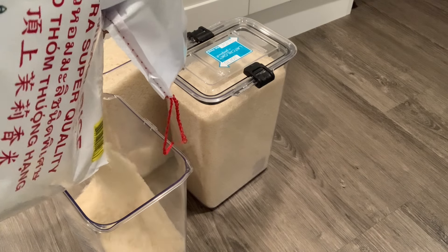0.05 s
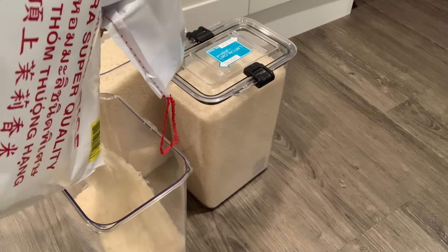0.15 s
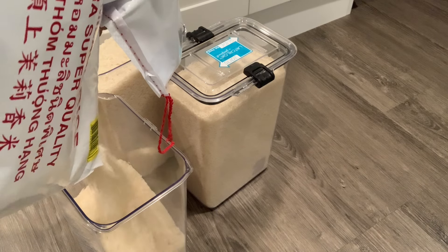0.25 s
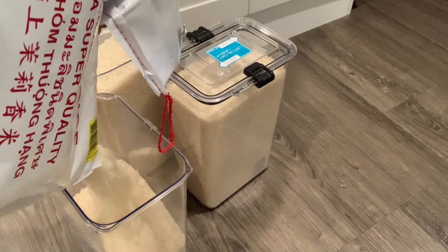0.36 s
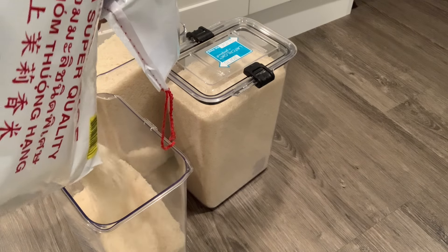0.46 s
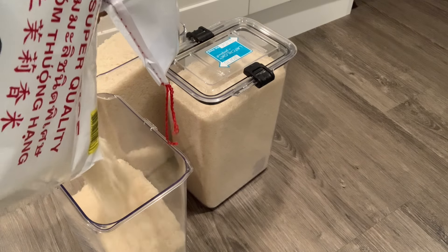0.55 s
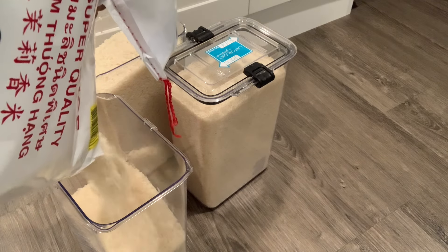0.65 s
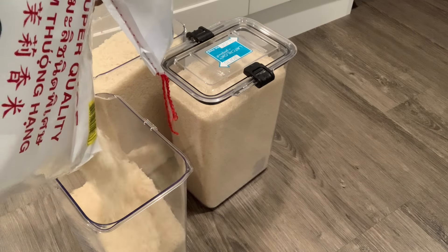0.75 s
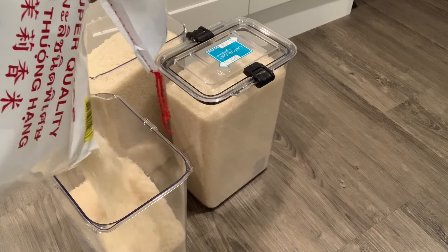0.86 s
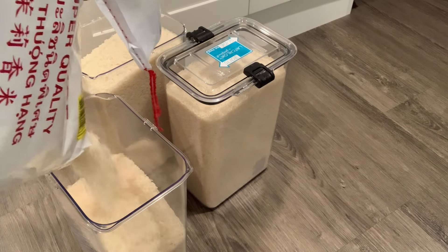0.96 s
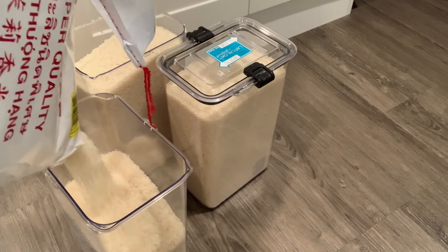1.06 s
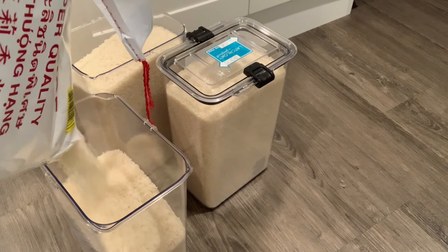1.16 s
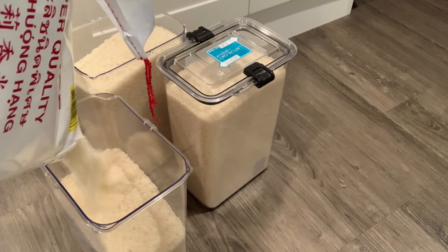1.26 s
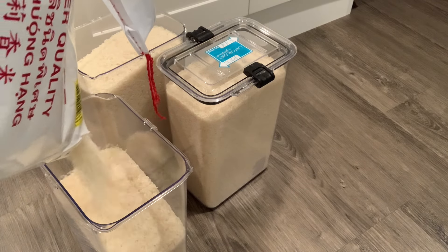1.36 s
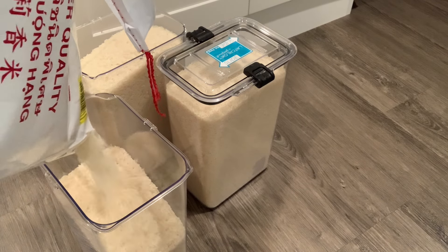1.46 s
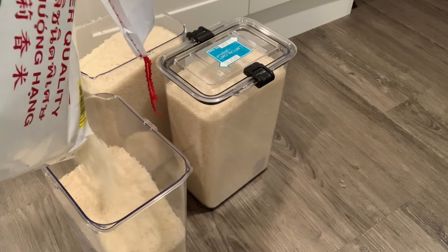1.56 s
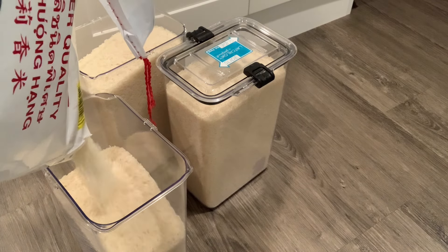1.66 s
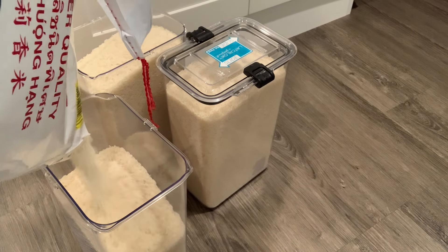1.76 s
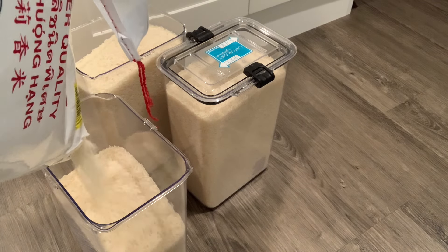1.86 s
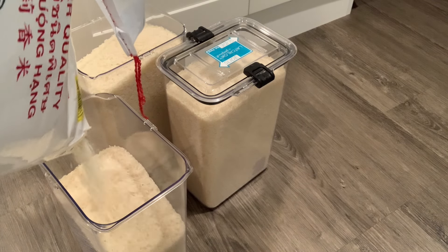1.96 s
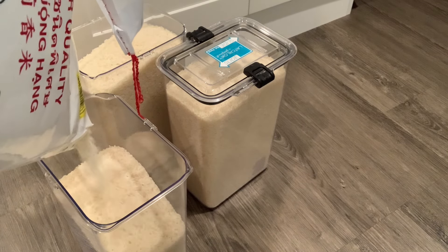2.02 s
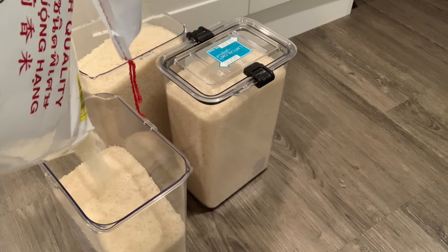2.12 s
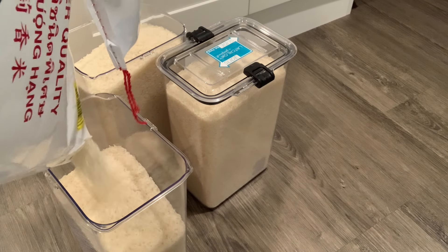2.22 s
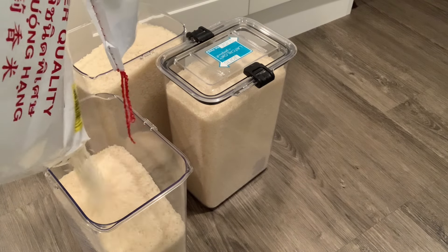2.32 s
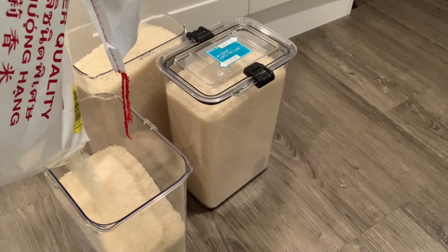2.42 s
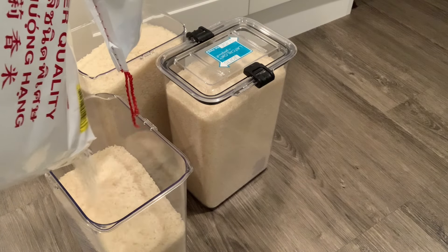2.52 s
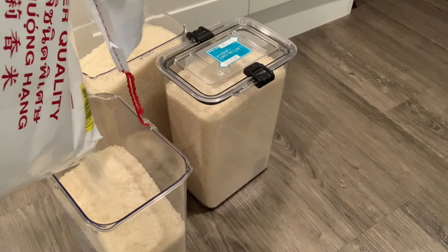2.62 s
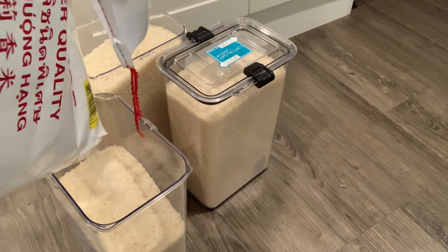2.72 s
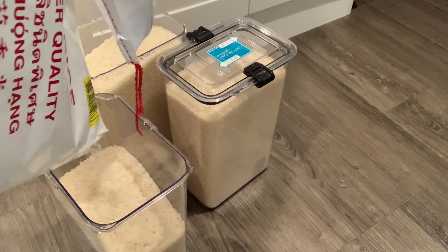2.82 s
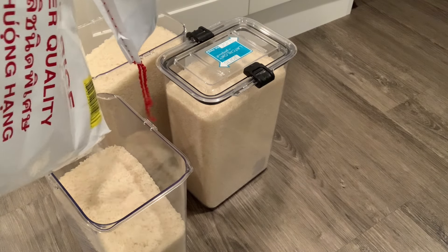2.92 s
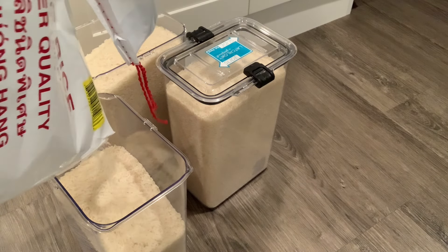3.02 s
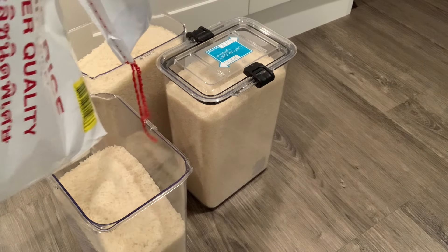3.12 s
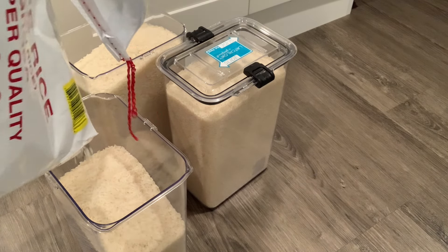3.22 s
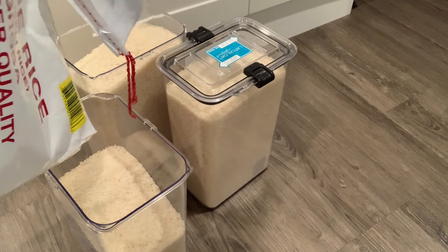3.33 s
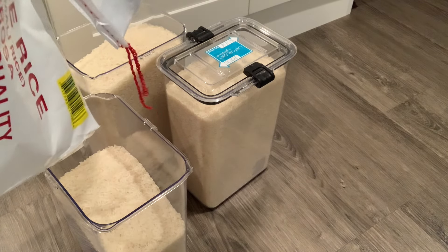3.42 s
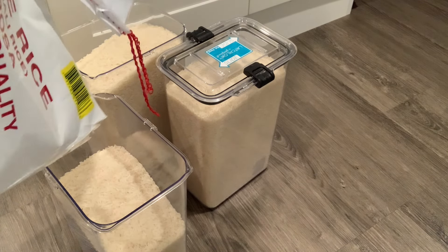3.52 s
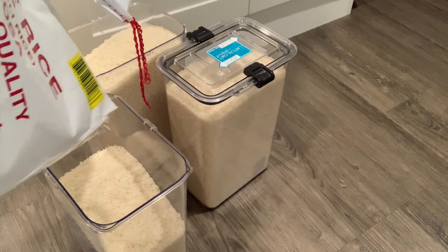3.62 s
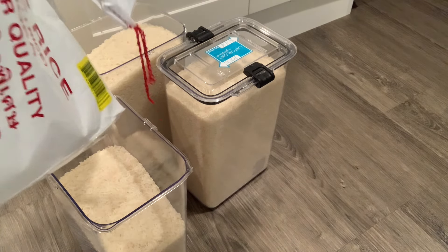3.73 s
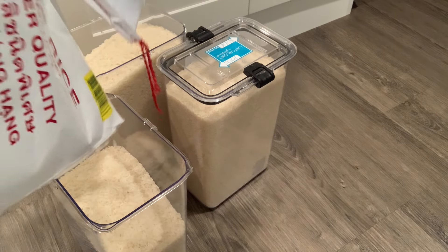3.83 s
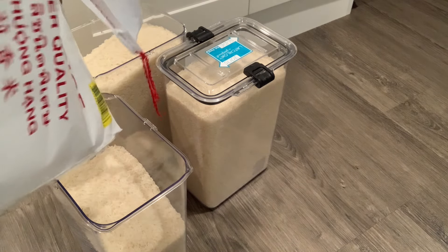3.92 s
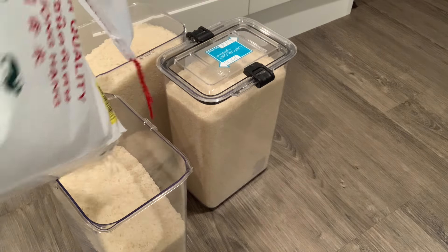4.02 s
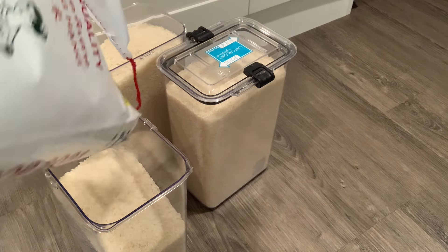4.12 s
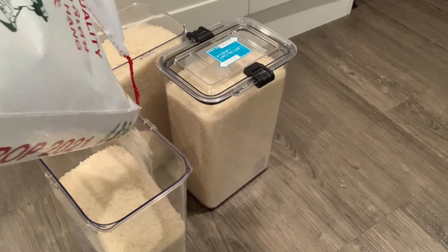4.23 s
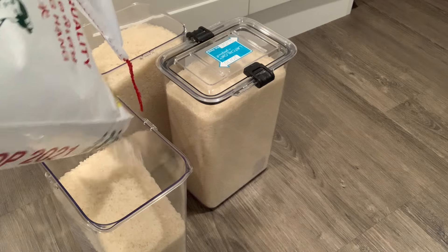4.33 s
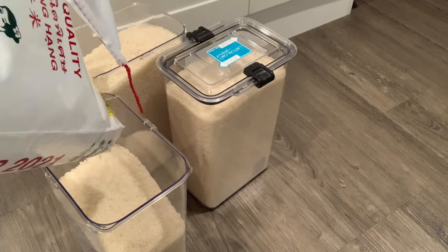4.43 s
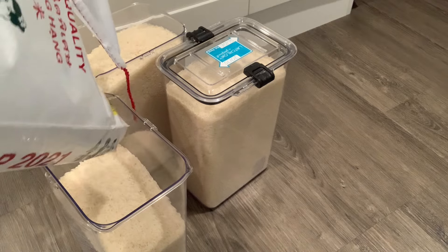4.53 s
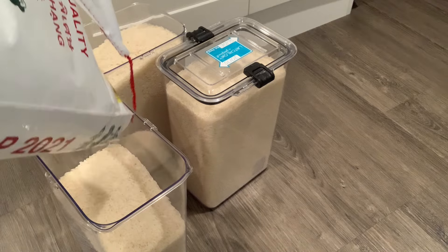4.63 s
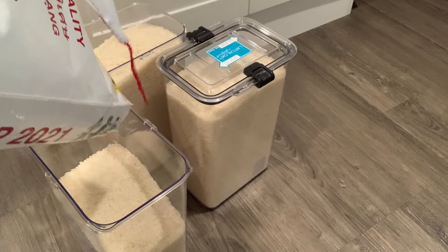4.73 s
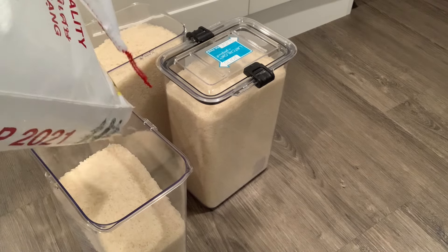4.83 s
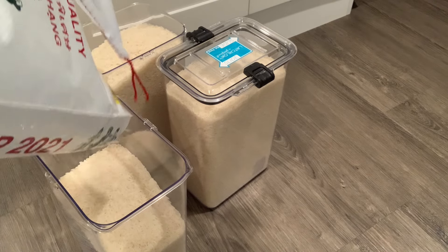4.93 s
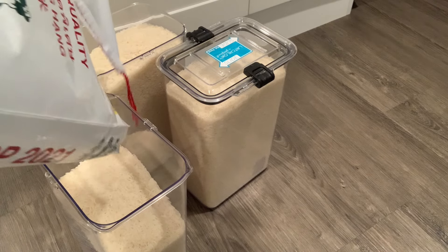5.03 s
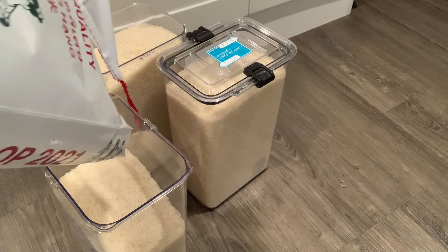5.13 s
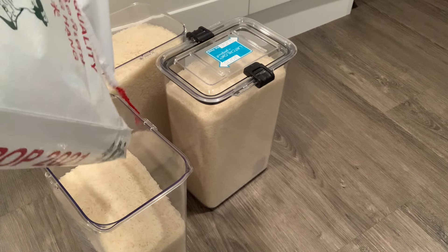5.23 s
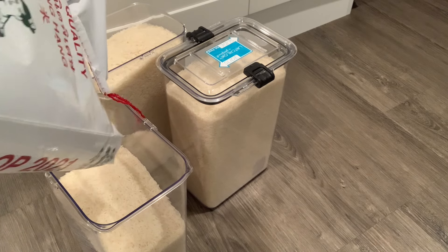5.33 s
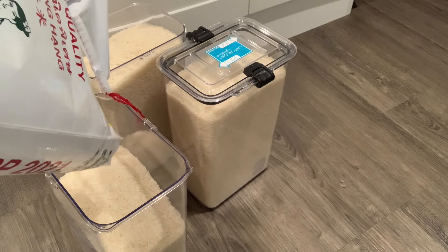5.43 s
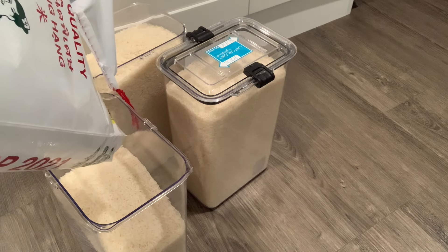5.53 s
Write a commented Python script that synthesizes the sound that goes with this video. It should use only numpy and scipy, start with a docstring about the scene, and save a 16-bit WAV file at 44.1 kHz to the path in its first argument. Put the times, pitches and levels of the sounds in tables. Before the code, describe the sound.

Close stereo pickup in a quiet home kitchen: rice streams steadily onto a heap in a tub, sliding along stiff plastic film. One sharp crack comes early, and a burst of heavy buckling thumps follows two seconds in. The rush fades to a few ticks near the middle. The sack is tipped again, giving a short gush, uneven patter, crinkling creases and a final cluster of booming pops.

```python
"""Dry rice hisses from a big plastic sack into a plastic tub on a kitchen floor.
Grains hit the heap as random impacts; others slide and patter along the sack's wall and make it drum.
The stiff sack buckles with pops and dull thumps, and its creases crinkle with sharp ticks.
The flow thins out, then the sack is tipped again. Filtered impacts make the noisy sounds;
short sine waves make the ringing ones. Faint room noise and kitchen echoes surround them."""
import sys
import numpy as np
from scipy import signal
from scipy.fft import rfft, irfft, next_fast_len
from scipy.io import wavfile
from scipy.ndimage import uniform_filter1d

SR = 44100
rng = np.random.default_rng(int(sys.argv[2]) if len(sys.argv) > 2 else 0)


def to_wav(s):
    """Save 16-bit WAV."""
    ch = np.atleast_2d(s).T  # columns
    pcm = np.round(np.clip(ch, -1, 1) * 32767)  # PCM
    wavfile.write(sys.argv[1], SR, pcm.astype(np.int16))


N = 245637
TIME = np.arange(N) / SR
PADDED = next_fast_len(N + SR // 2) // 2 * 2
HZ = np.maximum(np.arange(PADDED // 2 + 1) * SR / PADDED, 1)
PATHS = (3, N)  # sound that reaches both microphone ports alike, the left only, the right only

# Levels in these tables and settings are starting points: the functions add fixed trims to many of them.

# rice stream landing on the heap: start_s, level_db
STREAM_LEVEL = [(0.0, -26.5), (1.5, -29.5), (1.97, -35), (2.34, -31.5), (3.23, -53), (3.36, -56.5),
                (3.43, -76), (3.74, -71), (3.82, -52.5), (3.92, -52.5), (4.0, -52.5), (4.34, -44),
                (4.5, -47), (5.57, -51.5)]
# pockets of rice that land all at once when the sack is tipped again: top_s, level_db, fall_by_10_db_s
RICE_GUSHES = [(4.3, -32, 0.105)]
# rice sliding along the sack towards its mouth: start_s, level_db
SLIDE_LEVEL = [(0.0, -30.5), (0.49, -31), (1.61, -38), (1.95, -37.5), (2.44, -28.5), (2.87, -35),
               (3.4, -51), (3.72, -63), (3.915, -64), (3.955, -48.5), (4.17, -41.5), (4.34, -36),
               (4.52, -36.5), (4.66, -32.5), (4.86, -37.5), (5.02, -41), (5.2, -42.5), (5.36, -33),
               (5.57, -32.5)]
# the load slips inside the sack and the slide swells: top_s, level_db, fall_by_10_db_s
LOAD_SLIPS = [(2.45, -32, 0.03), (2.52, -34.5, 0.09), (2.83, -35, 0.0154), (2.892, -35, 0.0035),
              (3.1, -39.5, 0.0039), (3.147, -41, .015), (3.187, -42, 0.01), (3.3, -48, 0.06),
              (4.04, -45.5, 0.03), (4.41, -37.5, 0.0242), (4.69, -33.5, 0.05), (4.808, -32, 0.0359),
              (5.48, -30, 0.07)]
# an even flow breaks into clumps as the sack runs low: start_s, clumping_db
FLOW_CLUMPING = [(2.2, 1.23), (4.2, 2.9)]
# the sack gapes after the big buckle, lies flat when tipped again, bulges as it is folded:
# start_s, hollow_level_db
SACK_HOLLOWNESS = [(0, -3.5), (1.8, -2), (2.4, 1), (3.3, 4), (3.7, 3.5), (4.1, -4.5), (4.8, -4.5),
                   (5.03, -1.5), (5.2, 1.5), (5.42, -2.5)]

# tone colour of grains on the heap: pitch_hz, relative_level_db_per_hz
HEAP_COLOUR = [(100, -11), (550, -3.5), (1500, -26.5), (4000, -4.5), (7000, -4), (10000, -3), (14000, 2),
               (16000, -1)]
# resonances of the air above the heap: pitch_hz, width_hz, boost_db
TUB_AIR_RESONANCES = [(1600, 360, 9), (670, 170, 3.5)]
# tone colour of grains sliding on the film: pitch_hz, relative_level_db_per_hz
FILM_COLOUR = [(200, -39), (900, -3.5), (1600, 1), (2400, 3), (4000, -0.55), (6000, -3.5), (8500, -13),
               (16000, -22.5)]
# tub resonances woken by the sliding rice: pitch_hz, width_hz, boost_db
TUB_RESONANCES = [(1595, 120, 4.5), (3800, 160, 2.5)]
# tone colour of the hollow drumming: pitch_hz, relative_level_db_per_hz
DRUM_COLOUR = [(60, -33), (190, -6), (350, -4), (620, 3), (820, 2.5), (1050, 1), (1500, 2.5), (2200, -0.5),
               (5000, -26.5)]
# resonances of the sack's cavity: pitch_hz, width_hz, boost_db
CAVITY_RESONANCES = [(225, 27, 6), (369, 41, 6), (485, 27, 3.5), (657, 54, 5), (831, 42, 6), (990, 44, 3.5),
                     (1214, 50, 3), (1433, 47, 2)]
# drumming: reference slide level, drum level at that slide, and share of the slide's swing in dB
FULL_SLIDE_DB, DRUM_DB, DRUM_FOLLOWS = -30, -31.5, 0.71
# the sack's mouth flexes, so resonances wander: rough share of their pitch, changes a second
FLEX_SHARE, FLEX_PER_S = .045, 5
# range of centre pitches for clumps tapping the film
PATTER_LOW_HZ, PATTER_HIGH_HZ = 1100, 4900

# tone colour of the swaying wall: pitch_hz, relative_level_db_per_hz
SWAY_COLOUR = [(20, -35), (45, -3.5), (85, 1), (130, -6.5), (250, -14), (800, -39.5)]
# the wall's slowest swing: pitch_hz, width_hz, boost_db
WALL_RESONANCES = [(89, 71, 2.5)]
# the load shifts and the wall heaves: top_s, level_db, fall_by_10_db_s
WALL_HEAVES = [(1.562, -31.5, 0.04), (1.87, -25.5, 0.04), (1.99, -30, 0.0152), (2.05, -29, 0.07),
               (2.24, -23, .015), (2.287, -16, 0.0056), (2.39, -38, 0.1), (2.655, -41.5, 0.1),
               (3.485, -44, 0.1), (5.14, -26, 0.0169), (5.29, -20, 0.04)]
# trembling wall: level under a 0 dB stream, and share of the stream's swing in dB
TREMBLE_DB, TREMBLE_FOLLOWS = -25.5, 0.86

# crease snaps at set times, loud and faint: start_s, peak_db, body_relative_to_peak_db, body_pitch_hz
CREASE_SNAPS = [(0.0933, -18, 0, 1920), (0.2837, -4, -1, 2790), (1.1942, -27.5, 10.5, 2700),
                (1.522, -22.5, 12, 2810), (2.2704, -7, -1.5, 2985), (2.585, -16, 0.5, 2400),
                (2.788, -16, -15, 2970), (2.825, -20, 0.5, 1790), (3.2117, -20.5, -14, 2990),
                (3.802, -19.5, -21, 4040), (3.8762, -34.5, -12, 4000), (3.924, -29, -7, 4000),
                (4.1724, -14.5, -1, 3100), (4.178, -22, 4, 3070), (4.2816, -14, -4.5, 2300),
                (4.3914, -27, 7, 3000), (4.4044, -27, 8, 1690), (4.4658, -17.5, 4, 2100),
                (4.5405, -18, 9, 1800), (4.585, -27.5, 12.5, 1900), (4.621, -20.5, 4, 2800),
                (4.7048, -16, -6, 3220), (4.8355, -23, -12, 3000), (4.9558, -21.5, 5, 1560),
                (5.0013, -15.5, -1, 3600), (5.3625, -18, 3.5, 2500), (5.43, -10.5, 0.5, 3320),
                (5.455, -15, -2, 3000), (5.471, -19, 2, 3180), (5.491, -19, 6, 2600)]
# small creases snap while the sack is bent:
# start_s, end_s, snaps_per_s, typical_peak_db, body_relative_to_peak_db
SACK_BENDS = [(4.68, 5.15, 26, -23.5, -5), (5.297, 5.55, 13, -22, -6)]
# tone colour of a crease tick: pitch_hz, relative_level_db_per_hz
TICK_COLOUR = [(500, -50), (2000, -13), (5000, -3), (9000, 4.5), (13500, 2), (16000, 2)]
SMALL_SPREAD_DB, SMALL_HZ = 3.5, 2800  # small snaps: most above or below typical, body pitch
CREASE_OCTAVES, CREASE_T60_S = 1.8, 0.026  # pitch spread and time to die away by 60 dB

# the sack buckles: start_s, knock_peak_db, crack_db, thump_db, pop_db, pop_pitch_hz
# (crack, thump and pop levels are relative to the knock)
SACK_BUCKLES = [(0.163, -21.5, -16, -5, 0.5, 740), (0.283, -8, -6.5, -20, 1, 1502),
                (1.115, -25.5, -18, -1, -8, 706), (1.523, -14.5, -12, -2, 0, 720),
                (1.549, -18.5, -16, -2, -2, 560), (1.852, -13, -8.5, -5, -2.5, 1148),
                (2.011, -17.5, -25, -4, 4.5, 760), (2.05, -17, -22, -3, 2.5, 780),
                (2.077, -17.5, -24, -1, 4.5, 780), (2.119, -18.5, -3, -18, -6, 1410),
                (2.227, -5, -12.5, 0, -2, 820), (2.273, -8, -5.5, -6, -1, 652),
                (2.287, -2, -8.5, -3, -2, 753), (2.49, -17.5, -5, -3, -1, 800),
                (2.652, -14.5, -18, 0, 1, 800), (4.121, -24, -12, 5, 1, 1450),
                (5.078, -13.5, -10, -2, 0, 760), (5.113, -25.5, -18, 8.5, 1, 450),
                (5.131, -19, -16, -3, 0.5, 700), (5.153, -18, -15, 0, 3.5, 760),
                (5.199, -18, -9, -2, 0, 1000), (5.22, -15.5, -13, -3, 3.5, 720),
                (5.242, -10, -10, -11, 0.5, 850), (5.249, -3, -4.5, -6, -0.5, 560),
                (5.275, -15, -14, 6.5, 1, 420), (5.3, -17, -6, 4, -5, 520)]
# tone colours of the four parts of a buckle: pitch_hz, relative_level_db_per_hz
POP_COLOUR = [(300, 0), (16000, 0)]
CRACK_COLOUR = [(300, 1.5), (1400, -26), (3000, 10.5), (5000, 1.5), (8000, 2), (16000, -22)]
KNOCK_COLOUR = [(250, -12), (520, 1), (850, -2.5), (1450, -3), (2100, -5), (3500, -19.5), (8000, -41)]
THUMP_COLOUR = [(70, -14.5), (140, -4), (230, -1), (380, 1), (600, -5), (1100, -21.5), (3000, -62)]
# a big fold settles with a second blow: threshold, delay, then changes in level
BIG_FOLD_DB, SETTLE_S, SETTLE_DB, SETTLE_THUMP_DB, SETTLE_POP_DB = -9.5, .0145, -6, -11, -4.5
KNOCK_T60_S, THUMP_STRETCH = 0.082, 1.8  # the thump lasts longer by this factor
POP_OCTAVES, POP_T60_S = 1.307, 0.043  # pitch spread and time to die away by 60 dB
# a pop falls in pitch as slower bending waves arrive: start over final pitch, time constant
POP_START_RATIO, POP_FALL_S = 2.3, .003

# a slackening panel rings and drops in pitch: start_s, start_pitch_hz, end_pitch_hz, level_db
PANEL_TWANGS = [(2.013, 600, 395, -11.5), (2.086, 580, 390, -18), (2.297, 500, 370, -11),
                (4.124, 560, 390, -28)]
# the bulk of the rice shifts with a low rustle: top_s, level_db, fall_by_10_db_s
RICE_RUMBLES = [(3.68, -53, .08), (4.3, -39.5, .14), (5.075, -33, .05)]
RUMBLE_LOW_HZ, RUMBLE_HIGH_HZ = 300, 680

# tone colour of the quiet kitchen: pitch_hz, relative_level_db_per_hz
QUIET_COLOUR = [(25, -3), (65, 3.5), (150, -9.5), (600, -1), (2000, -31), (6000, -52), (16000, -49.5)]
KITCHEN_T60_S, KITCHEN_DB = .16, -15  # echoes: time to die away by 60 dB, level beside the direct sound
# the microphone pair: pitch_hz, shared_sound_0_to_1, left_lead_radians, left_minus_right_db
PORT_PAIR = [(60.5, 0.57, 2.73, 0), (208, 0.56, 1.87, 4), (580, 0.53, 2, 5), (921, 0.68, 1.67, 6),
             (1520, 0.71, 0.97, 0), (2332, 0.52, 1.925, -1.5), (3580, 0.29, 0.88, -.5),
             (6370, 0, 0.32, 0.5)]
# the same columns for the treble: the two sides oppose near 9 kHz and agree again above 13 kHz
PORT_PAIR_TREBLE = [(7300, .55, 2.4, 0), (8400, .99, 3.05, 0), (9700, .99, 3.2, 0), (10400, .8, 3.6, 0),
                    (11300, .65, 4.5, 0), (13000, .99, 6.28, 0), (16000, .99, 6.28, 0)]
CUTOFF_HZ = 15900


def from_db(db):
    """Turn decibels into gain."""
    return 10 ** (np.asarray(db) / 20)


def rms_one(x):
    """Scale to an average strength (rms) of 1."""
    return x / np.sqrt(np.mean(x ** 2) + 1e-20)


def in_time(rows):
    """Read a table's columns at every sample, with straight lines between rows."""
    s, *columns = np.transpose(rows)
    return [np.interp(TIME, s, column) for column in columns]


def in_hz(rows):
    """Read a table's columns at every frequency, on a logarithmic pitch scale."""
    hz, *columns = np.transpose(rows)
    return [np.interp(np.log(HZ), np.log(hz), column) for column in columns]


def drift(rate):
    """Wander between random values, rate of them a second, drawn with spread 1."""
    knots = rng.standard_normal(int(rate * 6) + 2)
    return np.interp(TIME * rate, np.arange(len(knots)), knots)


def colour(x, spectrum, resonances=()):
    """Filter with a broad colour and narrow peaks, without sound ahead of its cause; keep white noise's power."""
    db = in_hz(spectrum)[0]
    for hz, width_hz, peak_db in resonances:
        db = db + peak_db / (1 + (2 * (HZ - hz) / width_hz) ** 2)
    # folding the cepstrum forward gives the minimum-phase filter
    cepstrum = irfft(np.log(rms_one(from_db(db))))
    fold = 1 + np.sign(PADDED // 2 - np.arange(PADDED))
    fold[0] = 1
    response = np.exp(rfft(cepstrum * fold))
    return irfft(rfft(x, PADDED) * response)[:, :N]


def grains(per_s, spread_db):
    """Random impacts of uneven size on each path, scaled to rms 1 whatever their rate."""
    chance = np.clip(per_s / SR, 1e-3, 1)
    sizes = from_db(spread_db * np.minimum(rng.standard_normal(N), 2.5))
    hits = (rng.random(PATHS) < chance) * rng.choice([-1, 1], PATHS)
    return rms_one(sizes / np.sqrt(chance) * hits)


def bursts(times, levels_db, t60s, rise_s):
    """Envelope of events that swell quickly and die away; their powers add."""
    power = np.zeros(N)
    for s, db, t60 in zip(times, levels_db, np.broadcast_to(t60s, len(times))):
        start = int(s * SR)
        age = TIME[:min(N - start, SR // 2)]
        rise = np.minimum(age / rise_s, 1) ** 2
        decay = from_db(-60 * np.maximum(age - rise_s, 0) / t60)
        power[start:start + len(age)] += (from_db(db) * rise * decay) ** 2
    return np.sqrt(power)


def swells(rows):
    """Envelope of events that rise and fall smoothly; their powers add."""
    power = 0
    for s, db, fall_s in rows:
        power = power + from_db(db - 10 * (np.abs(TIME - s) / fall_s) ** 1.47) ** 2
    return np.sqrt(power)


def pings(times, levels_db, pitches_hz, octaves, t60, rise_s, count, start_ratio=1):
    """Facets of film ring at scattered pitches that may start high and fall; levels are rms at the start."""
    out, age = np.zeros((PATHS[0], PADDED)), TIME[:SR // 20]
    # time as the ring feels it: it runs fast at first when the pitch starts high
    glide = age + (start_ratio - 1) * POP_FALL_S * (1 - np.exp(-age / POP_FALL_S))
    rise = np.minimum(age / rise_s, 1)
    chances = rng.random((len(times), 4, count, 1))  # one row for pitches, three for phases
    for s, db, centre_hz, chance in zip(times, levels_db, pitches_hz, chances):
        place = (np.arange(count)[:, None] + chance[0]) / count - .5
        turns = centre_hz * 2 ** (octaves * place) * glide + chance[1:]
        ring = np.sin(2 * np.pi * turns).sum(axis=1) * np.sqrt(2 / count)
        decay = from_db(db - 60 * np.maximum(age - rise_s, 0) / t60)
        start = int(s * SR)
        out[:, start:start + len(age)] += ring * decay * rise
    return out[:, :N]


def flow():
    """State of the pour in dB: stream with gushes, slide with slips, and how clumpy they run."""
    stream_db = 20 * np.log10(from_db(in_time(STREAM_LEVEL)[0] + 0.86) + swells(RICE_GUSHES))
    slide_db = 20 * np.log10(np.hypot(from_db(in_time(SLIDE_LEVEL)[0] - 0.54), swells(LOAD_SLIPS)))
    return stream_db, slide_db, in_time(FLOW_CLUMPING)[0]


def rice_landing(stream_db):
    """Grains hiss on the heap: a stronger stream means more impacts a second."""
    level = from_db(stream_db + 4 + 1.28 * drift(50))
    landing = grains(22000 * from_db(stream_db + 28), spread_db=5.5) * level
    return colour(landing, HEAP_COLOUR, TUB_AIR_RESONANCES)


def rice_sliding(slide_db, clumps_db):
    """Grains rattle along the film in small clumps and excite the tub's resonances."""
    level = from_db(slide_db + 3.0 + clumps_db)
    sliding = grains(5000 * from_db(slide_db + 33), spread_db=4.3) * level
    return colour(sliding, FILM_COLOUR, TUB_RESONANCES)


def flexing(x):
    """Read x a little fast and slow by turns, so that its resonances glide up and down."""
    smooth_drift = uniform_filter1d(drift(FLEX_PER_S), SR // 10)
    lag_s = smooth_drift * FLEX_SHARE / FLEX_PER_S / np.sqrt(2)
    return np.array([np.interp((TIME + lag_s) % TIME[-1], TIME, path) for path in x])


def rice_drumming(slide_db, clumps_db):
    """Sack and tub drum under the sliding rice, coloured by the sack's flexing cavity."""
    drum_db = DRUM_DB + DRUM_FOLLOWS * (slide_db - FULL_SLIDE_DB) + in_time(SACK_HOLLOWNESS)[0]
    level = from_db(drum_db + 3 + 0.71 * clumps_db)
    drumming = grains(5000 * from_db(drum_db + 36), spread_db=3.5) * level
    return flexing(colour(drumming, DRUM_COLOUR, CAVITY_RESONANCES))


def rice():
    """One flow of grains lands, slides and drums; sliding and drumming share the same clumps."""
    stream_db, slide_db, clumping_db = flow()
    clumps_db = clumping_db * (1.19 * drift(260) + 0.65 * drift(70) + 0.33 * drift(21.98))
    return rice_landing(stream_db) + rice_sliding(slide_db, clumps_db) + rice_drumming(slide_db, clumps_db)


def film_patter():
    """Clumps of grains tap the taut film; they stand out more as the stream thins."""
    s, size, place = rng.random((700, 3)).T * [[TIME[-1]], [1], [1]]
    _, slide_db, clumping_db = flow()
    level_db = np.interp(s, TIME, slide_db + 2.5 * clumping_db) - 6.5 + 9 * size ** 2
    pitches_hz = PATTER_LOW_HZ * (PATTER_HIGH_HZ / PATTER_LOW_HZ) ** place
    return pings(s, level_db, pitches_hz, octaves=0.802, t60=0.038, rise_s=.0005, count=2)


def sack_sway():
    """The loose wall pushes air: it trembles with the stream and heaves as the load shifts."""
    tremble = from_db(TREMBLE_DB + TREMBLE_FOLLOWS * flow()[0])
    push = np.hypot(tremble, swells(WALL_HEAVES)) * from_db(3.5)
    return colour(rng.standard_normal(PATHS) * push, SWAY_COLOUR, WALL_RESONANCES)


def quiet_kitchen():
    """Faint steady noise, made of filtered random samples."""
    return from_db(-56.0) * colour(rng.standard_normal(PATHS), QUIET_COLOUR)


def small_snaps():
    """Rows like those of the crease snaps at set times, scattered at random over each bend of the sack."""
    rows = []
    for start, end, per_s, db, body_db in SACK_BENDS:
        chance = rng.random((40, 2))[:int(per_s * (end - start))]
        for when, size in chance:
            peak_db = db + SMALL_SPREAD_DB * (2 * size - 1)
            rows.append((start + (end - start) * when, peak_db, body_db, SMALL_HZ))
    return rows


def sack_crinkles():
    """A crease snaps with a bright tick, and the facets around it ring a little longer."""
    s, peak_db, body_db, body_hz = np.transpose(CREASE_SNAPS + small_snaps())
    tick = grains(40000, spread_db=1) * bursts(s + .001, peak_db, .007, rise_s=.0012)
    body = pings(s + 0.00099, peak_db + body_db - 4.0, body_hz, CREASE_OCTAVES, CREASE_T60_S,
                 rise_s=0.0007, count=8)
    return colour(tick, TICK_COLOUR) + body


def sack_buckles():
    """A fold pops, lower for a wider panel; fast high bending waves crack, then come knock and thump."""
    settles = []
    for s, db, crack_db, thump_db, pop_db, hz in SACK_BUCKLES:
        if db > BIG_FOLD_DB:
            settles.append((s + SETTLE_S, db + SETTLE_DB, crack_db,
                            thump_db + SETTLE_THUMP_DB, pop_db + SETTLE_POP_DB, hz))
    s, peak_db, crack_db, thump_db, pop_db, pop_hz = np.transpose(SACK_BUCKLES + settles)
    pop = pings(s, peak_db + pop_db - 2.0, pop_hz, POP_OCTAVES, POP_T60_S,
                rise_s=0.0018, count=4, start_ratio=POP_START_RATIO)
    # the lower the part, the slower its rise
    crack_level = bursts(s, peak_db + crack_db - 3.0, KNOCK_T60_S, rise_s=0.0018)
    knock_level = bursts(s, peak_db - 5.0, KNOCK_T60_S, rise_s=0.0029)
    thump_level = bursts(s, peak_db + thump_db - 4.5, KNOCK_T60_S * THUMP_STRETCH, rise_s=0.00364)
    crack = grains(12000, spread_db=1.5) * crack_level
    knock = grains(12000, spread_db=5.0) * knock_level
    thump = grains(12000, spread_db=4.0) * thump_level
    return (colour(pop, POP_COLOUR, CAVITY_RESONANCES) + colour(crack, CRACK_COLOUR)
            + colour(knock, KNOCK_COLOUR, CAVITY_RESONANCES)
            + colour(thump, THUMP_COLOUR, CAVITY_RESONANCES))


def sack_twangs():
    """A ringing panel's pitch falls as its tension lets go."""
    out = np.zeros(PATHS)
    for s, start_hz, end_hz, db in PANEL_TWANGS:
        hz = end_hz + (start_hz - end_hz) * np.exp(-np.maximum(TIME - s, 0) / 0.0041)
        turns = np.cumsum(hz) / SR + rng.random((len(out), 1))
        out += np.sin(2 * np.pi * turns) * bursts([s], [db], .07, rise_s=.008)
    return out


def load_rumbles():
    """Many grains move together, muffled by the rice around them."""
    muffle = signal.butter(2, [RUMBLE_LOW_HZ, RUMBLE_HIGH_HZ], "band", fs=SR, output="sos")
    rustle = rms_one(signal.sosfilt(muffle, rng.standard_normal(PATHS)))
    return rustle * swells(RICE_RUMBLES)


def kitchen(x):
    """Dense echoes die away, different on each path, with about the same power as x."""
    age = TIME[:SR // 2]
    noise = rng.standard_normal((len(x), len(age)))
    echoes = noise * from_db(-60 * age / KITCHEN_T60_S) * (age >= .005)
    echoes /= np.sqrt(np.sum(echoes ** 2, axis=1, keepdims=True))
    return signal.fftconvolve(x, echoes, axes=1)[:, :N]


def microphones(paths):
    """Two ports share part of the sound, shifted in phase and level; the rest is each port's own."""
    common, lead, left_db = in_hz(PORT_PAIR + PORT_PAIR_TREBLE)
    common = np.clip(common, 0, 1)
    sides = np.array([[1], [-1]])  # left, right
    spectra = rfft(paths, PADDED)
    shared = np.sqrt(common) * spectra[0] * np.exp(.5j * lead * sides)
    own = np.sqrt(1 - common) * spectra[1:]
    return irfft((shared + own) * from_db(left_db * sides / 2))[:, :N]


def scene():
    """Rice and sack close by, in a quiet kitchen."""
    pour = rice() + film_patter() + load_rumbles()
    sack = sack_sway() + sack_crinkles() + sack_buckles() + sack_twangs()
    direct = pour + sack
    return microphones(direct + from_db(KITCHEN_DB) * kitchen(direct) + quiet_kitchen())


def record(dry):
    """Round off the loudest peaks and cut the top of the treble."""
    rounded = dry / (1 + dry ** 6) ** (1 / 6)
    return signal.sosfilt(signal.ellip(12, .1, 70, CUTOFF_HZ, fs=SR, output="sos"), rounded)


dry = scene()
out = record(dry)
to_wav(out)
```